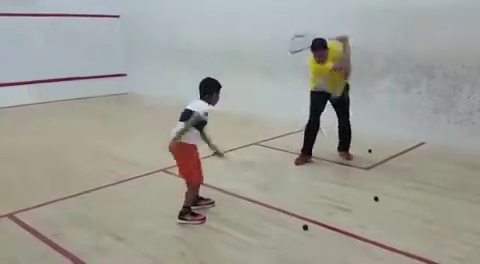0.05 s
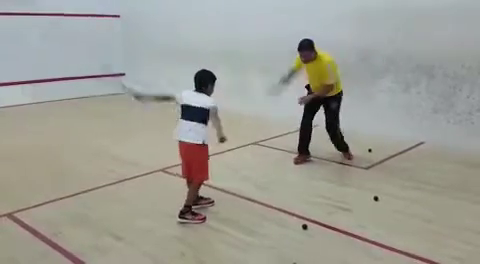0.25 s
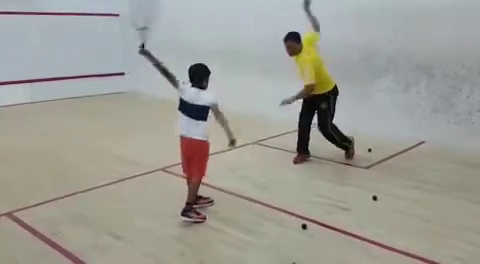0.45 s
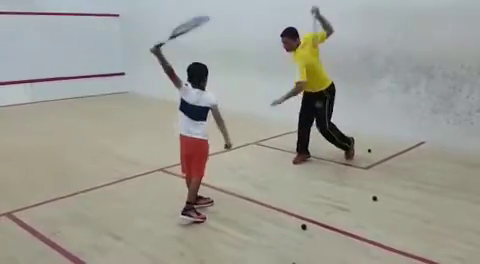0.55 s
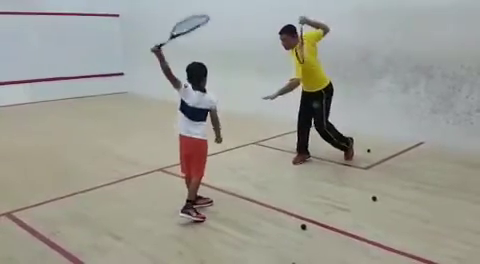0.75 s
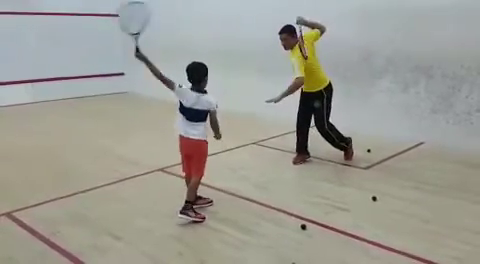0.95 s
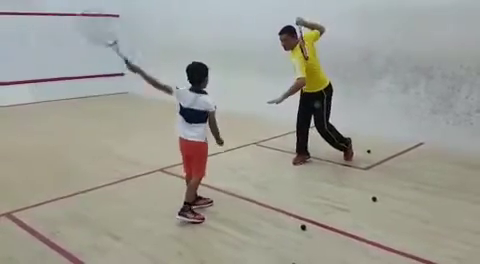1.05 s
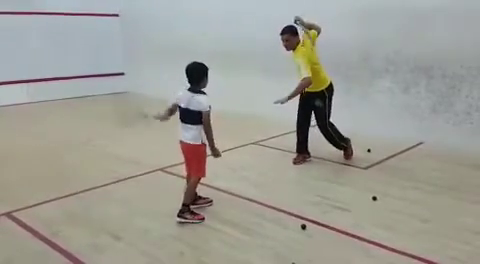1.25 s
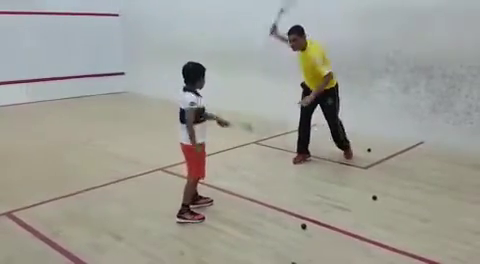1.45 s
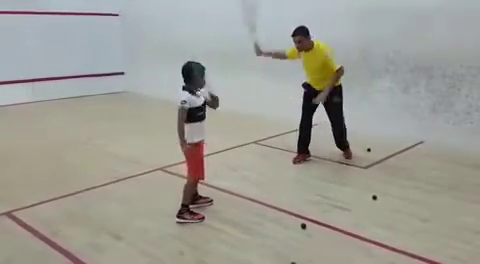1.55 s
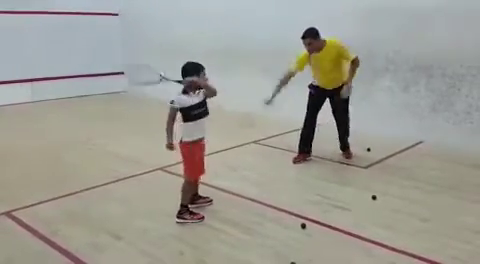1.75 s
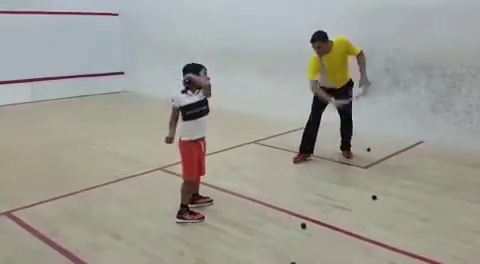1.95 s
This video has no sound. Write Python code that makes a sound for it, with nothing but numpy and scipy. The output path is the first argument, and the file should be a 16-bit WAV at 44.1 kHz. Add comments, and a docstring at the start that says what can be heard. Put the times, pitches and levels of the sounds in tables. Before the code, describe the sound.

One sharp squash hit with a hollow pop, ringing out through a hard-walled court.

```python
"""Squash stroke in a bare court

One hard stroke: the crack and hollow pop of the ball come back from floor and walls, with a low thud,
and merge into a long reverberation. Faint ventilation runs underneath; a soft footfall comes late.
A gain control ducks at the blow, holds, then lets the ringing court swell up again."""
import sys
import numpy as np
from scipy import signal
from scipy.fft import rfft, irfft
from scipy.io import wavfile

SR = 44100
rng = np.random.default_rng(int(sys.argv[2]) if len(sys.argv) > 2 else 0)


def dump(signal):
    """Clip the signal to [-1, 1] and save it as 16-bit WAV at the path in sys.argv[1]."""
    limited = np.clip(np.atleast_2d(signal).T, -1, 1)
    pcm = np.round(limited * 32767).astype(np.int16)
    wavfile.write(sys.argv[1], SR, pcm)


N = 88200
TIME = np.arange(N) / SR
FREQS = np.maximum(np.fft.rfftfreq(N, 1 / SR), 1)
SIDES = np.array([[1], [-1]])   # left, right


def from_db(db):
    """Decibels to gain."""
    return 10 ** (np.asarray(db) / 20)


def over_hz(points):
    """A curve through (frequency, value) points, straight on a log-frequency axis."""
    hz, value = np.transpose(points)
    return np.interp(np.log(FREQS), np.log(hz), value)


def colour(points, resonances):
    """Gain per frequency: a broad slope with resonant peaks on it."""
    peaks_db = sum(db / (1 + (2 * (FREQS - hz) / width) ** 2) for hz, width, db in resonances)
    return from_db(over_hz(points) + peaks_db)


def causal(gain):
    """The minimum-phase filter with this gain: nothing sounds before its cause."""
    cepstrum = irfft(np.log(gain), N)
    cepstrum[1:N // 2] *= 2
    cepstrum[N // 2 + 1:] = 0
    return np.exp(rfft(cepstrum))


def since(s):
    """Seconds since a moment, zero before it."""
    return np.maximum(TIME - s, 0)


def envelope(start_s, db, t60, attack_s):
    """A quick swell and an exponential decay that loses 60 dB in t60 seconds."""
    age = since(start_s)
    return from_db(db - 60 * age / t60) * (1 - np.exp(-age / attack_s))


def ring(start_s, hz, db, t60, attack_s):
    """A struck mode: a sine that swells and dies away."""
    return envelope(start_s, db, t60, attack_s) * np.sin(2 * np.pi * hz * since(start_s))


def diffuse(gain):
    """Spectrum of stereo noise from all around: centred in the bass, wide in the treble."""
    # likeness of the two ears in the court: (frequency [Hz], correlation [-1 to 1])
    likeness = [(60, 0.95), (125, 0.99), (250, .82), (500, 0.77), (1000, 0.079), (2000, -0.11),
                (8000, 0.09)]
    # stereo balance: (frequency [Hz], left minus right [dB])
    balance = [(100, 1), (250, -.5), (600, -1.3), (2000, -2.1), (4000, -2.8), (9000, 0)]
    mid, side = rfft(rng.standard_normal((2, N)))
    alike = np.clip(over_hz(likeness), -.99, .99)
    stereo = np.sqrt((1 + alike) / 2) * mid + SIDES * np.sqrt((1 - alike) / 2) * side
    return gain * from_db(SIDES * over_hz(balance) / 2) * stereo


def ventilation():
    """Steady dull air noise filling the hall, with a few wavering fan tones."""
    # air rush and hall rumble: (frequency [Hz], level [dB])
    air = [(20, -46.5), (48, -11), (80, -19.5), (140, -19), (250, -27), (400, -28.5), (580, -26.5),
           (760, -33), (1200, -35), (2000, -42), (3500, -56), (6000, -65), (9500, -74), (15000, -67)]
    # resonances in the ventilation: (frequency [Hz], width [Hz], lift [dB])
    air_rings = [(900, 42, 16.5), (1200, 150, 2.5)]
    # fan tones: (frequency [Hz], rms level [dB])
    hum = [(565, -51.5), (893.6, -52), (1211, -56)]
    air_db, waver_depth, waver_hz = 1.5, 0.47, 3
    out = from_db(air_db) * irfft(diffuse(colour(air, air_rings)), N)
    for hz, db in hum:
        # a narrow band of noise beats against the tone
        waver = irfft(rfft(rng.standard_normal((2, N))) / (1 + ((FREQS - hz) / waver_hz) ** 2), N)
        tone = np.sqrt(2) * np.sin(2 * np.pi * (hz * TIME + rng.random()))
        out += from_db(db) * (tone + waver_depth * waver / waver.std())
    return out


def footfall():
    """A soft step on the sprung wooden floor: a dull boom, blurred by the court."""
    boom_hz, width_hz = 145, 65
    boom = irfft(diffuse(1 / (1 + (2 * (FREQS - boom_hz) / width_hz) ** 2)), N)
    return boom / boom.std() * envelope(1.83, db=-31.5, t60=0.4, attack_s=0.018)


def court(blow):
    """Dense echoes off the nearest walls, then a long tail in which each band dies at its own rate."""
    # reverberation of the court: (frequency [Hz], t60 [s])
    decay_times = [(60, 3), (130, 1.22), (250, 2.41), (500, 2.937), (800, 3.12), (990, 3.41), (1250, 3.09),
                   (2000, 2.97), (3000, 2.52), (4500, 1.895), (7500, 1.22), (11000, 0.86), (16000, .65)]
    hit_s, first_wall_s = 0.2458, 0.262
    early_db, early_build_s, early_t60_s = 13.5, 0.0087, 0.93
    far_wall_s, swell_width_s, swell_db = 0.441, 0.034, 2
    field = diffuse(blow)
    tail = 0
    for centre_hz, t60 in decay_times:
        band = over_hz([(hz, hz == centre_hz) for hz, _ in decay_times])
        tail += irfft(field * band, N) * envelope(hit_s, db=16, t60=t60, attack_s=0.027)
    early = irfft(diffuse(blow), N) * from_db(early_db - 60 * since(hit_s) / early_t60_s)
    early *= 1 - np.exp(-since(first_wall_s) / early_build_s)
    # the far wall sends the sound back as a blurred swell
    swell = from_db(swell_db * np.exp(-((TIME - far_wall_s) / swell_width_s) ** 2))
    return (tail + early) * swell


def thud():
    """The weight of the blow: a few low modes ring briefly at each thump."""
    # low modes of the blow: (frequency [Hz], level [dB], t60 [s])
    modes = [(114, -1, 0.19), (136.5, -4.5, 0.43), (171.5, -7.5, 0.39), (231, -2, .1), (484.5, -0.5, 0.077)]
    # the thud and its return from the wall: (time [s], level [dB])
    thumps = [(0.253, 6), (.2800, 1)]
    return sum(ring(s, hz, thump_db + db, t60, attack_s=0.0022)
               for s, thump_db in thumps for hz, db, t60 in modes)


def ball():
    """The hollow ball rings as it rebounds: a short pitched pock."""
    # modes of the ball: (frequency [Hz], level [dB], t60 [s])
    modes = [(985.4, 10, 0.098), (1434, 1.5, 0.14), (1700, 0.5, 0.21)]
    rebound_s = 0.2985
    return sum(ring(rebound_s, hz, db, t60, attack_s=0.003) for hz, db, t60 in modes)


def blow_colour():
    """The tone of the stroke, shared by crack and reverberation: a full body with a hollow pop."""
    # broad colour of the blow: (frequency [Hz], level [dB])
    body = [(40, -25.5), (80, -16.5), (110, -2), (160, -0.5), (240, -1), (350, -8.5), (480, -6),
            (750, -9.5), (1250, -8), (1800, -3.5), (2130, -10), (2700, -11), (3600, -17), (4500, -18.5),
            (6000, -28), (8000, -25.5), (8800, -43), (10500, -38.5), (15000, -38)]
    # resonances of ball, strings and court: (frequency [Hz], width [Hz], lift [dB])
    pop = [(146, 43, 4), (215, 34, 2), (593, 150, 5.5), (958, 219, 9.5), (1369, 100, 3), (1660, 36, 0.5),
           (2336, 99, 9.5), (4356, 130, 4.5)]
    return colour(body, pop)


def crack(blow):
    """Each arrival is a sharp pulse and a brief scatter, in the blow's colour with the bass thinned."""
    # the blow and its clearest reflections:
    # (time [s], level [dB], left minus right [dB], right ear's lead [ms], tilt above 1 kHz [dB/octave])
    arrivals = [(0.2461, -3, 2.5, 0, 0), (.2477, -4.5, 0.5, 0, 1), (.2491, 2.5, -4, .1, 1),
                (.2629, 0, -3, .2, 0), (0.2653, 3.5, -0.5, -.2, 0.5), (.2754, -2.5, 6, .2, 0),
                (.2820, -14.5, -2.5, -.1, 4.5), (.2920, -12, -2.5, .3, 2), (.2988, -7.5, -16, .1, -0.5),
                (.3272, 0, 2, 0, -1), (.3333, 0, -3.5, 0, -5.5), (.394, 0.5, -6.5, .1, -9.5)]
    crack_db, low_cut_hz = 32, 294
    scatter_db, scatter_s = 6.5, 0.0019   # energy against the pulse, decay time
    low_cut = FREQS / (FREQS + low_cut_hz)
    treble_octaves = np.log2(np.maximum(FREQS / 1000, 1))
    spectrum = 0
    for s, db, pan_db, lead_ms, tilt_db in arrivals:
        start = s + SIDES * lead_ms / 2000   # half the lead to each ear
        burst = rng.standard_normal((2, N)) * (TIME > start) * np.exp(-since(start) / scatter_s)
        burst *= from_db(scatter_db) / np.linalg.norm(burst, axis=1, keepdims=True)
        burst[np.arange(2), (start[:, 0] * SR).astype(int)] += 1   # the sharp pulse
        tone = causal(blow * from_db(tilt_db * treble_octaves) * low_cut)
        spectrum += from_db(crack_db + db + SIDES * pan_db / 2) * rfft(burst) * tone
    return irfft(spectrum, N)


def gain_control(x):
    """Ducks at once above the limit, as far as its range allows, holds, then eases back to full gain."""
    limit_db, max_cut_db = -17, 16.5
    detect_s, look_ahead_s, hold_s, recover_s = 0.0118, 0.0025, 0.571, 0.292
    step = 32   # samples between gain updates
    pole = np.exp(-1 / (detect_s * SR))
    power = signal.lfilter([1 - pole], [1, -pole], np.mean(x ** 2, axis=0))
    needed_db = np.minimum(10 * np.log10(power[::step] + 1e-12) - limit_db, max_cut_db)
    cut_db, ducked_s, cuts = 0, 0, []
    for s, need_db in zip(TIME[::step], needed_db):
        if need_db > cut_db:
            cut_db, ducked_s = need_db, s
        elif s - ducked_s > hold_s:
            cut_db *= np.exp(-step / SR / recover_s)
        cuts.append(cut_db)
    return x * from_db(-np.interp(TIME + look_ahead_s, TIME[::step], cuts))


def scene():
    """The stroke, the court's answer, a step and the air."""
    blow = blow_colour()
    return crack(blow) + thud() + ball() + court(blow) + footfall() + ventilation()


def record(dry):
    """Gain control, full-scale clipping and a steep top cut."""
    cutoff_hz = 15800
    top_cut = signal.ellip(12, .2, 90, cutoff_hz, fs=SR, output="sos")
    return signal.sosfilt(top_cut, np.clip(gain_control(dry), -1, 1))


dry = scene()
out = record(dry)
dump(out)
```